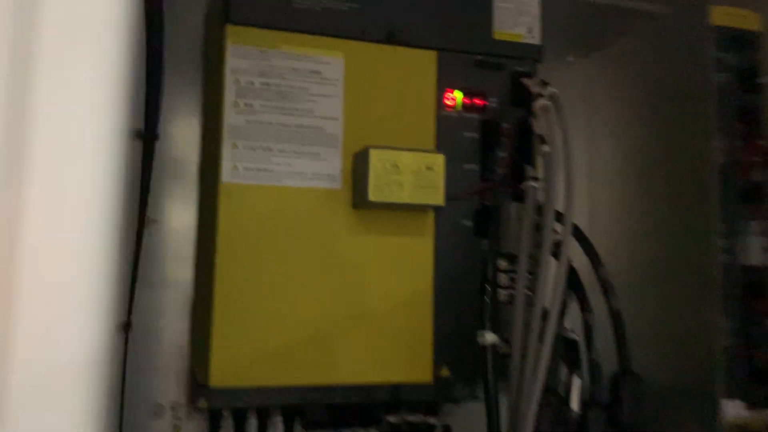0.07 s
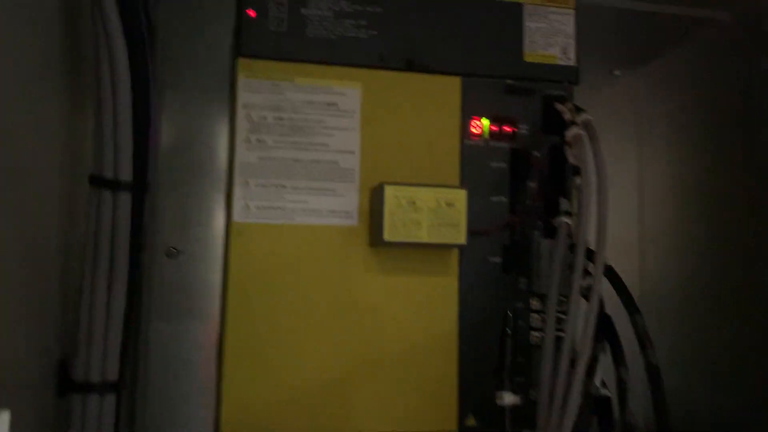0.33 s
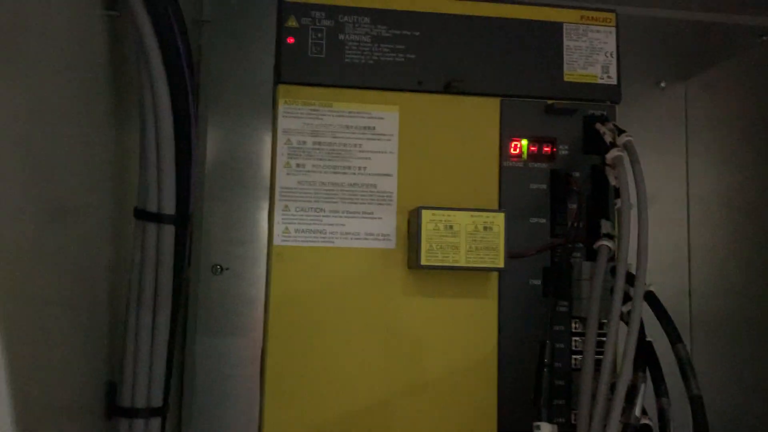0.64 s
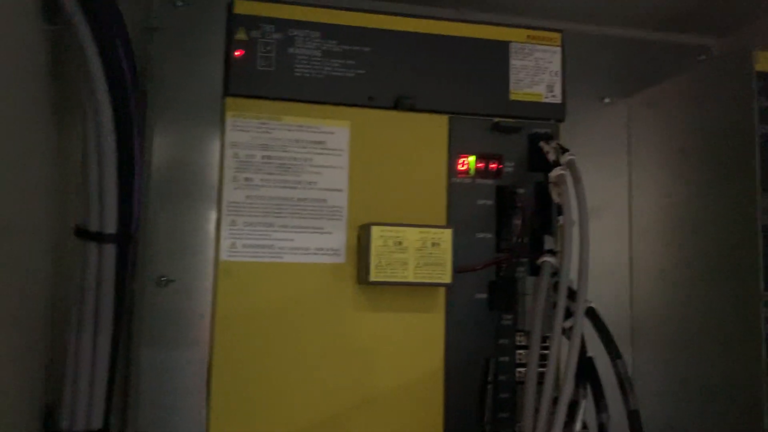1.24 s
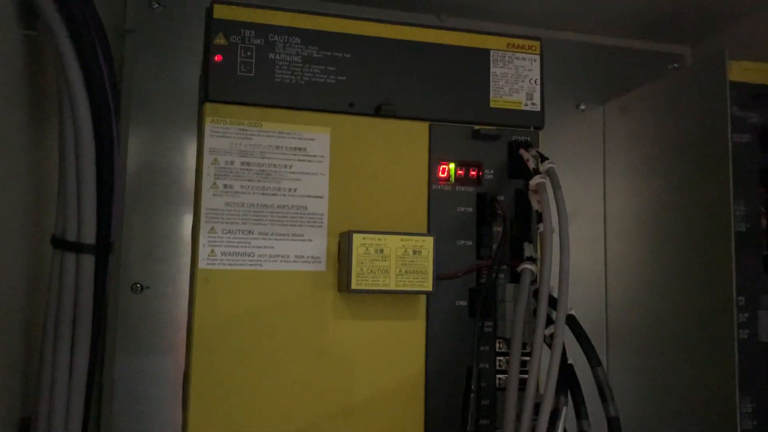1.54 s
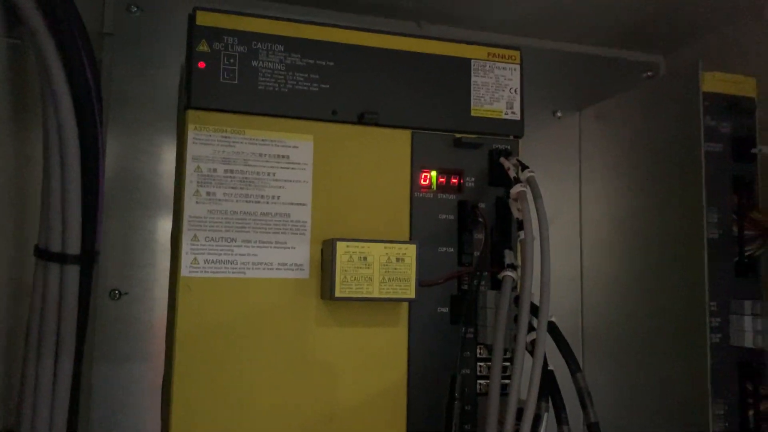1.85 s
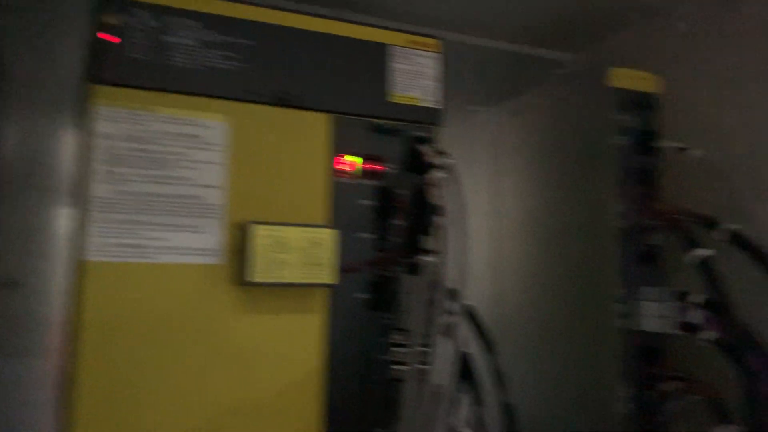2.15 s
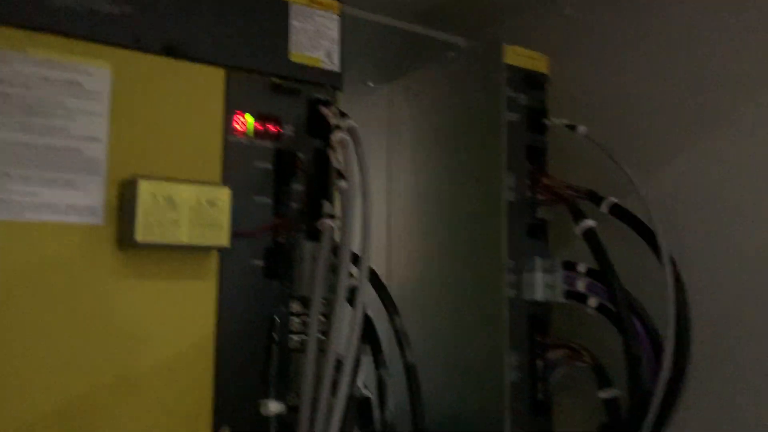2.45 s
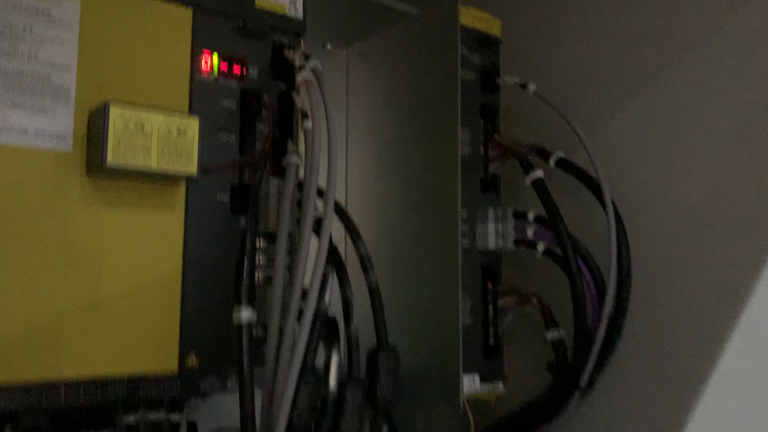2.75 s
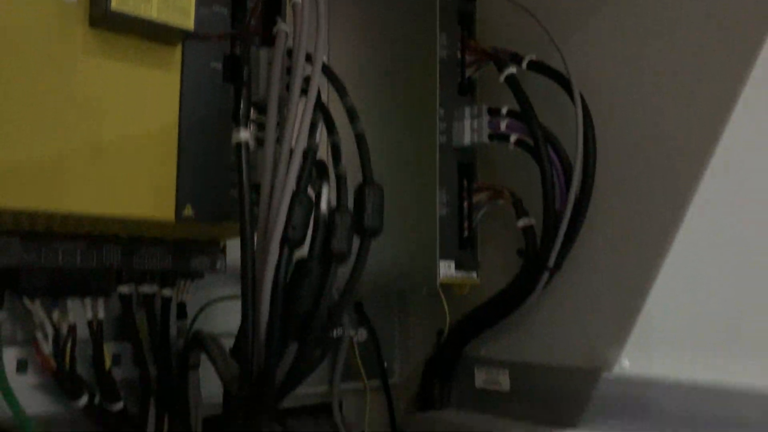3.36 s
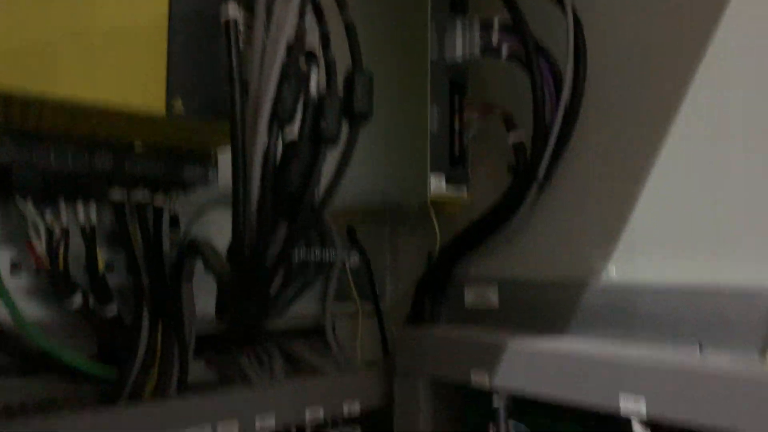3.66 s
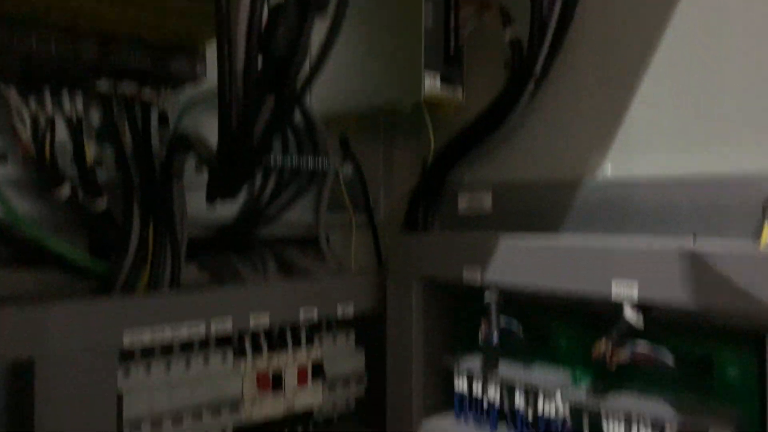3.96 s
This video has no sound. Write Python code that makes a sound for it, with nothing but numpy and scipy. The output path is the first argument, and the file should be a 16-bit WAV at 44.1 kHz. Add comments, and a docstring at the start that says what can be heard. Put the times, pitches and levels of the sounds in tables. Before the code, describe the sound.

A cooling fan whines close up for all four seconds, over rushing air, a motor hum and factory rumble booming in an open cabinet. A hand softly brushes the microphone at the start. Distant metal clinks and knocks ring briefly in the hall, around 0.5, 1.4, 1.9, 2.6 and 3.2 seconds. The whine dips from about 3 to 3.5 seconds as the microphone moves, then returns.

```python
"""Inside a machine's open control cabinet in a factory hall, on a hand-held stereo microphone.
Close up, a cooling fan whines over rushing air and a motor hums beside it; the hall's rumble booms
in the cabinet. Farther off, metal parts clink and knock a few times and ring on in the hall.
Whine and rumble shift as the microphone moves, and a hand brushes it at the start."""
import sys
import numpy as np
from scipy import signal
from scipy.fft import rfft, irfft
from scipy.io import wavfile
from scipy.ndimage import uniform_filter1d

SR = 44100
rng = np.random.default_rng(int(sys.argv[2]) if len(sys.argv) > 2 else 0)


def bounce(signal):
    """Save signal as a 16-bit WAV file at the path given by the first command-line argument."""
    frames = np.transpose(np.atleast_2d(signal))
    limited = np.clip(frames, -1, 1)
    pcm = np.round(limited * 32767).astype(np.int16)
    wavfile.write(sys.argv[1], SR, pcm)


N = 176400
T = np.arange(N) / SR
HZ = np.fft.rfftfreq(N, 1 / SR)


def fan(blades=4, jitter_hz=.25):
    """Close fan: the blades whine at a multiple of the shaft speed, among weaker shaft orders."""
    # time_s, shaft_hz
    speed = [(0, 208.7), (.3, 209.95), (.65, 209.1), (1.35, 209.8), (1.95, 209.7), (2.65, 209.5),
             (3.3, 210.1), (3.9, 209.6)]
    # blade tone at the moving microphone: time_s, left_db, right_db
    whine = [(0, -35, -30), (.6, -34, -27), (1.8, -32.5, -26.7), (2.55, -34.5, -28.5), (3.0, -42, -31.3),
             (3.25, -37.5, -36), (3.42, -41, -37), (3.85, -34, -30), (4, -35, -30.5)]
    # shaft harmonics: order, left_db, right_db, share_of_swell
    orders = [(3, -49, -45, 0), (5, -43.5, -42.5, 1.2), (8, -53, -52, .6), (9, -60, -56, .4),
              (11, -62, -61, .4)]
    shaft_hz = curves(speed, T)[0] + jitter_hz * drift(rate_hz=4)[0]
    turns = np.cumsum(shaft_hz) / SR
    level_db = curves(whine, T)
    swell_db = level_db.mean(0) - level_db.mean()
    out = tone(blades * turns, level_db, waver=.27)
    for order, left, right, share in orders:
        out += tone(order * turns + rng.random(), share * swell_db + [[left], [right]], waver=.42)
    return out


def motor_and_whines(base_hz=114.85):
    """Beside the fan: a motor's hum stands in the cabinet, among steady hums and thin whines."""
    # motor harmonics: order, left_db, right_db, right_lag_rad
    orders = [(5, -38.5, -39, -2.7), (6, -50, -57, 0), (8, -50, -52, 0), (10, -50.5, -59, -2),
              (16, -56, -53, 2.3), (20, -59, -59, 0)]
    # low steady hums and thin whines, with faint electrical interference tones at 8 and 12 kHz:
    # pitch_hz, left_db, right_db, right_lag_rad
    steady_tones = [(148.5, -43, -43, 0), (298.7, -41.5, -38.5, 0), (1346, -57, -63, 0),
                    (2680, -62, -62, 0), (4029, -62, -63, 0), (8000, -77, -77, 0), (11999, -77, -77, 0)]
    partials = [(order * base_hz, *rest) for order, *rest in orders] + steady_tones
    out = np.zeros((2, N))
    for hz, left, right, lag in partials:
        lag_turns = np.array([[0], [lag]]) / (2 * np.pi)
        out += tone(hz * T + rng.random() - lag_turns, [[left], [right]], waver=.4)
    return out


def cabinet_air():
    """Fan air rushes; hall rumble excites cabinet resonances that change as the microphone turns."""
    # base spectrum of the hall: frequency_hz, level_db
    rumble = [(10, -88), (19, -82), (29, -75), (48, -53.5), (68, -49.5), (100, -50.5), (120, -55),
              (180, -54.5), (260, -52.5), (340, -51), (390, -56.5), (460, -54), (620, -59), (750, -66.5),
              (1200, -70.5), (3000, -100)]
    # base spectrum of the fan air: frequency_hz, level_db
    rush = [(10, -110), (400, -87), (750, -63), (880, -60), (1200, -65), (1700, -67), (2400, -70),
            (2900, -72.5), (3600, -74.5), (4150, -74), (4900, -81), (6000, -82.5), (7000, -84.5)]
    # air resonances: centre_hz, width_hz, then lift_db at each of boom_times
    booms = [(145.4, 21, 6, 7, 7.9, 4.5), (221.2, 26, 1, 3, 10.27, 7.6), (268, 18, 4.5, 2.5, 4.5, 1.8),
             (296, 24, 5.5, 6, 5.7, 6.9), (439, 52, 3, 4, 3.9, 3.8), (612, 75, -1.5, -2.5, 7.6, 6.94)]
    # microphone positions: time_s
    boom_times = [.4, 1.7, 3.1, 4]
    ports = microphone_ports(*fluttering_noise())
    booms_db = sum(np.outer(lifts, 1 / (1 + (2 * (HZ - hz) / width) ** 2)) for hz, width, *lifts in booms)
    out = np.zeros((2, N))
    for lift_db, crossfade in zip(booms_db, np.eye(len(boom_times))):
        gain = np.hypot(amp(spectrum(rumble, HZ) + lift_db), amp(spectrum(rush, HZ)))
        out += irfft(ports * gain, N) * np.interp(T, boom_times, crossfade)
    return out


def fluttering_noise(patch_db=1.24, flutter_db=.53, size=2048):
    """Spectra of two air noises that flutter, their bands swelling as the microphone moves."""
    # band gains: time_s, rumble_db, body_db, air_db, treble_db
    movement = [(0, 1, -2, 1.5, 0.5), (.28, 5.5, 0.5, -0.5, 2), (.4, -0.5, 0.5, -0.1, 1),
                (.65, -0.5, 1.1, -0.5, 1), (1.1, -1, -1.3, -2, 0.7), (2.1, -1, -2, 0, 0.5),
                (2.7, 1, 0, 1.1, 1), (3.1, 0, -0.5, 3.5, 0.7), (3.5, -2, 1, 1.5, 0.5),
                (3.85, 5.5, 0, 1.5, 1.5), (4, -3, -1.5, 1.5, 0.5)]
    # those four bands: centre_hz
    bands = [80, 300, 1900, 8000]
    hop = size // 4
    frames, hz = N // hop + 5, np.fft.rfftfreq(size, 1 / SR)
    real_a, imag_a, real_b, imag_b, patches = rng.standard_normal((5, frames, len(hz)))
    patches = uniform_filter1d(patches, size=8, axis=0)
    patches = unit_rms(uniform_filter1d(patches, size=20, axis=1))
    flutter = unit_rms(uniform_filter1d(rng.standard_normal((frames, 1)), size=5, axis=0))
    shares = np.array([spectrum(list(zip(bands, row)), hz) for row in np.eye(len(bands))])
    move_db = curves(movement, np.arange(frames) * hop / SR).T @ shares
    cells = np.array([real_a + 1j * imag_a, real_b + 1j * imag_b])
    cells *= amp(move_db + patch_db * patches + flutter_db * flutter)
    _, noise = signal.istft(cells.swapaxes(1, 2), nperseg=size, noverlap=size - hop)
    return rfft(unit_rms(noise[:, :N]))


def microphone_ports(left, other, direct_hz=6280, lag_s=.000215, top_hz=8700):
    """Air noise at two ports; above direct_hz the fan's hiss arrives directly, at one port first."""
    # likeness of the ports: frequency_hz, correlation
    likeness = [(30, .88), (130, .95), (280, 0.86), (420, .55), (550, 0), (900, 0.16), (1300, -0.09),
                (2000, -.15), (3000, -0.13), (4500, -0.08), (6000, 0.08), (7000, 0.4), (8300, 0.8),
                (15000, .8)]
    # frequency_hz, left_minus_right_db
    balance = [(60, -0.5), (200, -0.3), (300, -1.5), (480, -1), (700, 6), (1000, -0.5), (2200, 1.5),
               (4200, -1), (5800, -2.5), (6800, -5), (7800, -0.7), (15000, 0.5)]
    same = spectrum(likeness, HZ)
    right = same * left + np.sqrt(1 - same ** 2) * other
    right *= np.exp(2j * np.pi * lag_s * np.maximum(HZ - direct_hz, 0))
    lean = amp(spectrum(balance, HZ) / 2)
    rolloff = amp(-12.5 * np.log2(np.maximum(HZ / top_hz, 1)))  # dB per octave
    return np.array([left * lean, right / lean]) * rolloff * np.sqrt(SR / 2)


def clinks(edge_level_db=-40.5):
    """Metal on metal, farther off: the parts' modes under a bright edge as short as the clatter."""
    # start_s, gain_db, decay_s, extra_ring_db, extra_edge_db
    blows = [(0.523, -7, .006, 7, 7), (.563, -3.5, 0.009, -12, 3), (1.447, 4.5, 0.013, -0.5, 0.5),
             (1.891, 5.5, .011, -1, -2), (2.042, -7, .012, 7, 0), (2.421, -2, 0.01, -14, -2),
             (2.576, 0.5, 0.017, 3, 1), (2.626, -10, .008, 5, 2), (3.156, -7.5, 0.025, 8.5, 8.5),
             (3.192, -7.5, .015, 9, -3), (3.322, -11, .02, 12, -3)]
    # modes of the parts: pitch_hz, width_hz, gain_db
    metal = [(2310, 220, 0.5), (3350, 140, 2), (3986, 124, 4), (4310, 76, 0.5), (4530, 110, 0),
             (5700, 180, -10)]
    # modes that ring on in the hall: pitch_hz, width_hz, gain_db
    hall_ring = [(3370, 100, -8), (4030, 65, 2), (4220, 100, -4), (4420, 140, -5)]
    # bright edge of the first contact: centre_hz, width_hz, gain_db
    tick = [(5260, 580, 2.5), (6800, 590, 5), (9700, 1600, -5)]
    edge_power = sum(amp(db + edge_db) ** 2 * contact(at, decay) for at, db, decay, _, edge_db in blows)
    body = hits(blows, metal, hall_ring, level_db=-32.5, hall_db=-9, t60_s=.9)
    return body + amp(edge_level_db) * np.sqrt(edge_power) * ringing(tick)


def knocks():
    """Duller blows on metal out in the hall, with a shorter ring."""
    # start_s, gain_db, decay_s, extra_ring_db
    blows = [(.257, -8.5, 0.0062, -3), (1.299, -11, .009, -3), (1.721, -3, .007, -13),
             (1.892, -5, .008, -10), (2.58, -6, 0.0086, -1), (2.972, -1, 0.006, -14)]
    # modes of the parts: pitch_hz, width_hz, gain_db
    modes = [(2316, 260, -3.5), (3360, 400, -11.5), (4080, 590, -16)]
    return hits(blows, modes, modes, level_db=-26, hall_db=-5, t60_s=.6)


def hand_brush():
    """A hand brushes the microphone: a short, soft hiss."""
    # handling noise: peak_s, spread_s, centre_hz, width_hz, level_db
    touch = (.05, .04, 10500, 2200, -48)
    peak_s, spread_s, hz, width, db = touch
    return amp(db) * np.exp(-((T - peak_s) / spread_s) ** 2) * ringing([(hz, width, 0)])


def hits(blows, modes, tail_modes, level_db, hall_db, t60_s):
    """Each blow is a short clatter with a ringing tail in the hall."""
    clatter, tail = np.zeros((2, N))
    for start, db, decay, ring_db, *_ in blows:
        clatter += amp(db) ** 2 * contact(start, decay)
        tail += amp(db + hall_db + ring_db) ** 2 * contact(start, t60_s / np.log(10 ** 6))
    return amp(level_db) * (np.sqrt(clatter) * ringing(modes) + np.sqrt(tail) * ringing(tail_modes))


def contact(start_s, decay_s, attack_s=.002):
    """Power of a blow: a quick rise and an exponential fall."""
    age = np.maximum(T - start_s, 0)
    return np.minimum(age / attack_s, 1) ** 2 * np.exp(-age / decay_s)


def ringing(modes):
    """Dense random contacts sounding through a set of resonances."""
    power = sum(amp(db) ** 2 / (1 + ((HZ - hz) / width) ** 2) ** 2 for hz, width, db in modes)
    return shaped_noise(np.sqrt(power))


def tone(turns, level_db, waver, rate_hz=14):
    """A partial whose strength and phase waver in the turbulent air."""
    swing = 1 + waver * (drift(rate_hz) + 1j * drift(rate_hz)) / np.sqrt(2)
    return np.sqrt(2) * amp(level_db) * (swing * np.exp(2j * np.pi * turns)).real


def drift(rate_hz):
    """Slow random motion for each channel."""
    return shaped_noise(1 / (1 + (HZ / rate_hz) ** 2))


def shaped_noise(gain):
    """Stereo noise of rms 1 with the given spectral shape."""
    return unit_rms(irfft(rfft(rng.standard_normal((2, N))) * gain, N))


def spectrum(points, hz):
    """Interpolates a table on a log-frequency axis."""
    frequencies, values = np.transpose(points)
    return np.interp(np.log(hz + 1), np.log(frequencies + 1), values)


def curves(rows, t):
    """Interpolates every column of a time table."""
    times, *columns = np.transpose(rows)
    return np.array([np.interp(t, times, column) for column in columns])


def amp(db):
    """Decibels to gain."""
    return 10 ** (np.asarray(db) / 20)


def unit_rms(x):
    """Scales to rms 1."""
    return x / np.sqrt(np.mean(x ** 2) + 1e-20)


def scene():
    """Machinery close to the microphone, metalwork out in the hall."""
    far_knocks = knocks()
    return fan() + motor_and_whines() + cabinet_air() + clinks() + far_knocks + hand_brush()


def record(dry, cutoff_hz=15750):
    """The recorder's band limit."""
    lowpass = signal.firwin(511, cutoff_hz, window=("kaiser", 9), fs=SR)
    return signal.oaconvolve(dry, lowpass[None], "same")


dry = scene()
out = record(dry)
bounce(out)
```